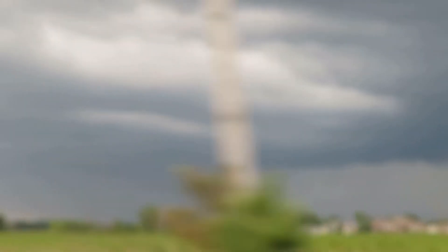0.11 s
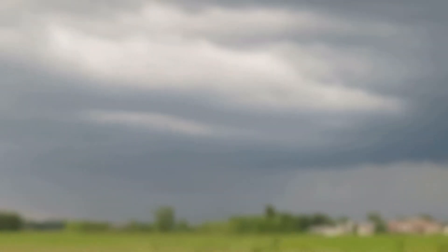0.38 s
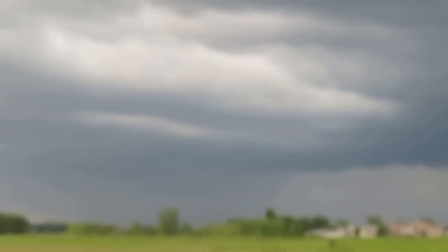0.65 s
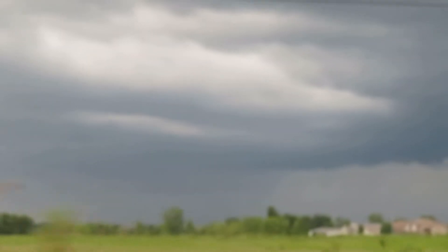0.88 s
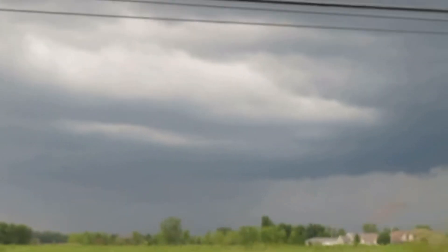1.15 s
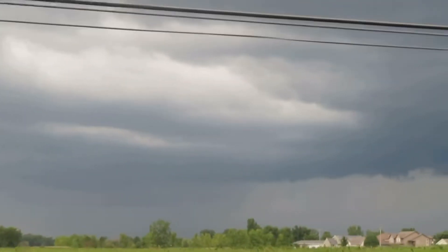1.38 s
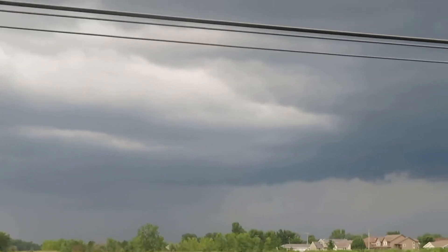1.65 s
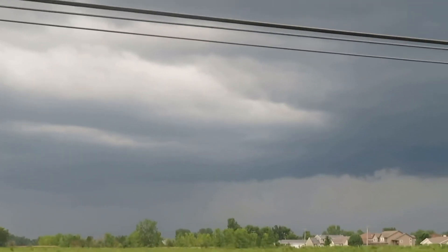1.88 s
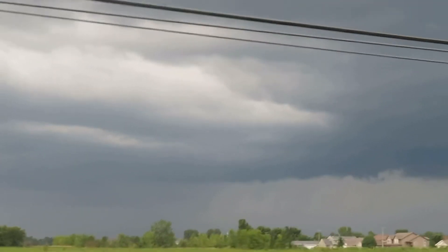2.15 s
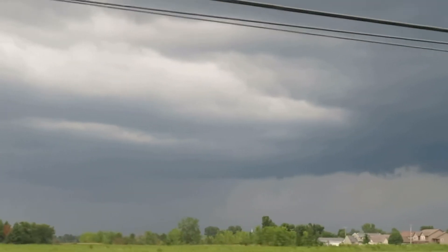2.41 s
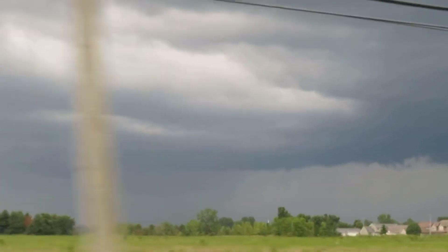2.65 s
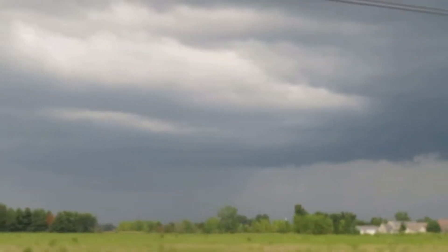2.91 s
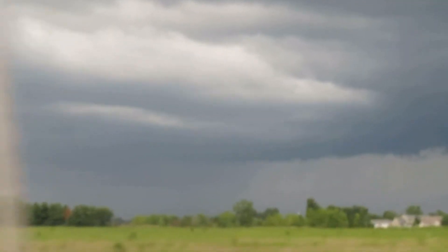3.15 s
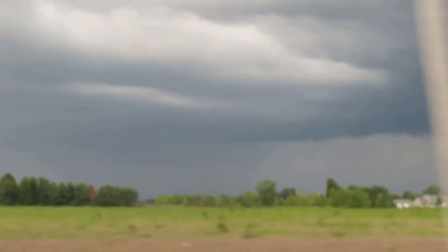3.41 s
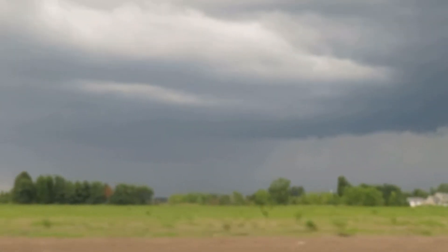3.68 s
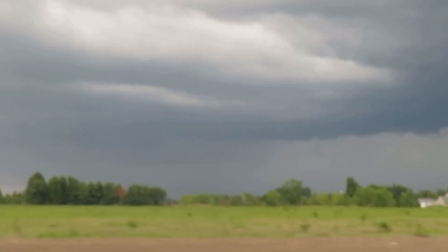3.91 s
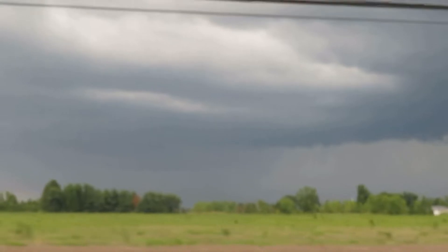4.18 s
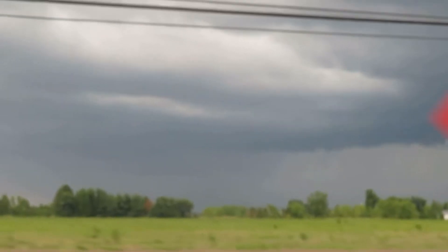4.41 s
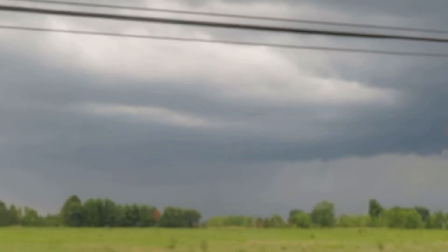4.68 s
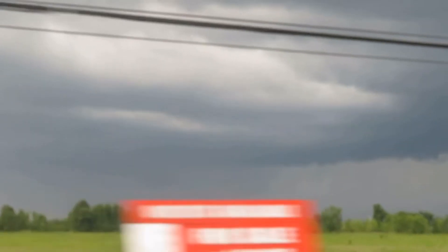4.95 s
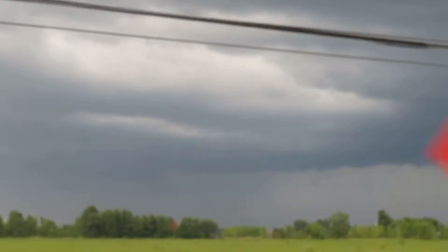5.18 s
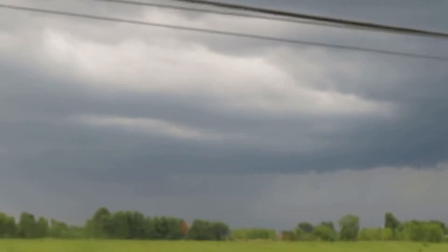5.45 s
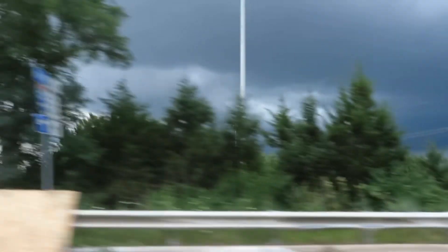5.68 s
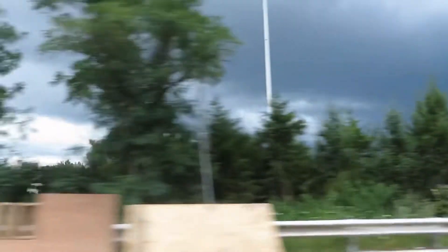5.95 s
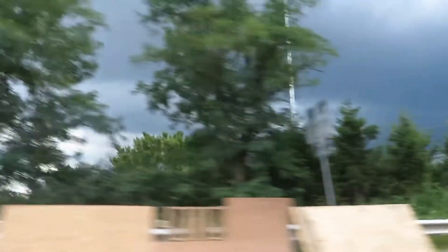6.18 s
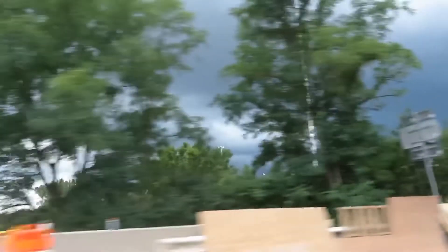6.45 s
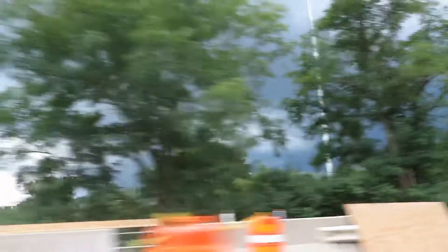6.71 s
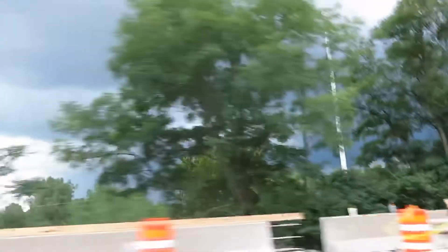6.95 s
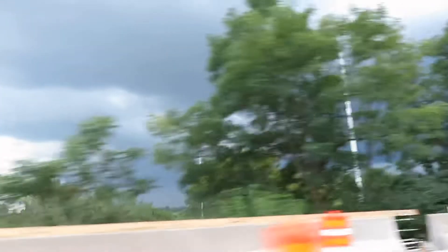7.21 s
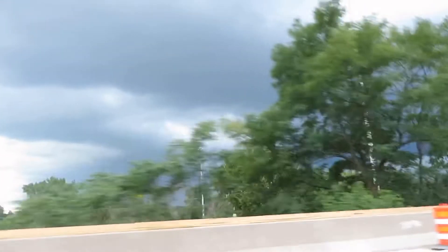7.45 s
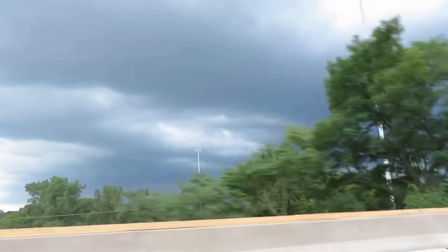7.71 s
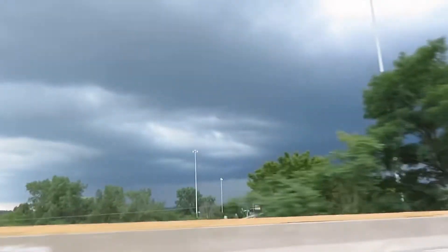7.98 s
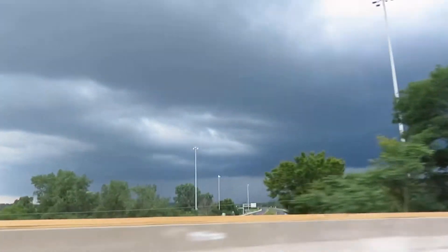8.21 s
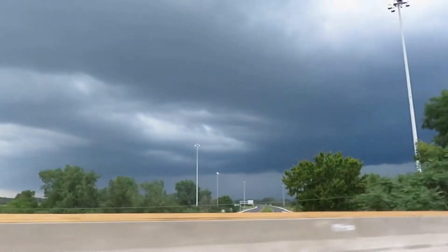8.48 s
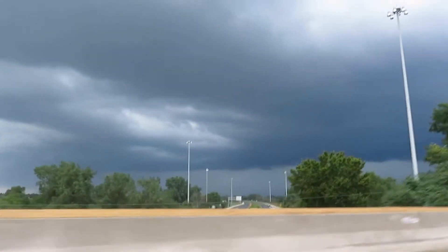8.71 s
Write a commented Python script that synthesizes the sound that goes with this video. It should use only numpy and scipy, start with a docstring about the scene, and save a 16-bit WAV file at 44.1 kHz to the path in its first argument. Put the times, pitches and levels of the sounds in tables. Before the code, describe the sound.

From 0 to about 5.4 seconds, a camera in a moving car catches dull, steady tyre roar with faint air hiss and lumpy low flutter. Irregular wind blasts hit the microphones: centred low thuds with wider, gritty crackle, especially hard near 0.6, 2.06, 4.0 and 4.6. The road noise drops quickly after many hits, then creeps back. Around 5.36 there is a tiny silence of under a tenth of a second. A different, slightly louder road follows, with deep buffeting rumble and lopsided shoves heavier on the left, strongest around 6.3 to 6.6. A light bright tick lands near 6.75. At about 6.96 the rumble stops abruptly and bass thins. A hollow, wavering tread hum swells around 7.5 and fades by 8.1, while crowded thumps and brighter crackle continue to the end near 8.9.

```python
"""Short thumps of wind strike a camera's two microphone ports throughout, over the tyre roar of a moving car.
Roar, air hiss and flutter are shaped noise; each thump is a low mono noise pulse with a wider crackle.
After a brief silent gap the road sounds different, and deep, lopsided rumble joins until the camera's
wind filter switches on and thins the bass; a hollow tread hum and a light tick come late.
The steady sound dips many times, fast, and creeps back."""
import sys
import numpy as np
from scipy import signal
from scipy.fft import rfft, irfft, next_fast_len
from scipy.io import wavfile
from scipy.ndimage import uniform_filter1d, map_coordinates

SR = 44100
rng = np.random.default_rng(int(sys.argv[2]) if len(sys.argv) > 2 else 0)


def gain_from_db(level_db):
    """Turn a decibel level (scalar or array-like) into a linear amplitude factor."""
    decades = np.asarray(level_db, float) / 20
    return 10 ** decades


def unload_audio(sound):
    """Save the sound as a 16-bit wav file, at the path given as the first command line argument."""
    columns = np.transpose(np.atleast_2d(sound))
    # keep every value between -1 and 1, then stretch to whole-number steps
    steps = np.round(np.clip(columns, -1, 1) * 32767)
    wavfile.write(sys.argv[1], SR, steps.astype(np.int16))


N = 390453  # length [samples]
GAP_START_S, GAP_END_S = 5.356, 5.42  # silence between the first and the second road
FILTER_ON_S = 6.957  # the wind filter switches on


def unit(x):
    """Normalisation: scale to rms 1."""
    return x / np.sqrt(np.mean(x ** 2) + 1e-20)


def along(points, hz):
    """Logarithmic frequency: read (Hz, value) points on a log axis."""
    f, v = np.transpose(points)
    return np.interp(np.log(hz + 1), np.log(f + 1), v)


def curves(rows):
    """Linear interpolation: one value per sample for each column after the time."""
    s, *cols = np.transpose(rows)
    return [np.interp(np.arange(N) / SR, s, c) for c in cols]


def wobble(rate):
    """Slow random fluctuation: a smooth curve through random knots, rate knots a second."""
    knots = rng.standard_normal(int(N * rate / SR) + 4)
    return map_coordinates(knots, [np.arange(N) * rate / SR])


def ports(pair, spectrum, alike):
    """Interchannel correlation: colour two unrelated signals and mix them to a given left-right likeness."""
    n = pair.shape[-1]
    hz = np.fft.rfftfreq(n, 1 / SR)
    turn = np.arccos(np.clip(along(alike, hz), -1, 1)) / 2
    z = rfft(pair) * gain_from_db(along(spectrum, hz))
    mid = irfft(z[0] * np.cos(turn), n)
    side = irfft(z[1] * np.sin(turn), n)
    return np.array([mid + side, mid - side])


def rush(spectrum, alike, patchy_db):
    """Non-stationary noise: a stereo rush of rms 1 with random gain patches in time and frequency."""
    z = signal.stft(rng.standard_normal((2, next_fast_len(N + 2048))), nperseg=512)[2]
    field = uniform_filter1d(rng.standard_normal(z.shape[1:]), size=5, axis=0)
    field = uniform_filter1d(field, size=8, axis=1)
    pair = signal.istft(z * gain_from_db(patchy_db * unit(field)), nperseg=512)[1]
    return unit(ports(pair, spectrum, alike)[:, :N])


# drops of the steady sound: (time [s], depth under full level [dB])
DIPS = [(0.108, 3), (0.62, 3), (0.86, 4.5), (1.06, 4.5), (1.367, 11.5), (2.079, 13.5), (2.2, 13), (2.81, 8),
        (2.97, 7.5), (3.427, 9.5), (4.02, 7.5), (4.602, 12), (5.482, 7.5), (6.401, 3.5), (6.5, 6), (6.6, 6),
        (6.799, 8), (8.262, 6), (8.75, 4.5)]


def dips():
    """Gain envelope: each drop falls fast, holds, then climbs steadily; the deepest one counts [dB]."""
    drop_s, hold_s, return_db_per_s = 0.015, 0.061, 11.5
    s, depth_db = np.transpose(DIPS)[:, :, None]
    t = np.arange(0, N + 64, 64) / SR
    climb_db = return_db_per_s * np.clip(t - s - drop_s - hold_s, 0, None)
    drop_db = np.clip((t - s) / drop_s, 0, 1) * (depth_db - climb_db)
    return -np.interp(np.arange(N) / SR, t, drop_db.max(0).clip(0))


# hollow tread hum relative to the roar: (time [s], level [dB])
GROOVE_LEVEL = [(6.9, -15), (7.05, -10.5), (7.5, 0.5), (7.75, -5), (8.1, -18.5)]
# left-right likeness of steady sounds: (frequency [Hz], correlation [-1 to 1])
ROAD_ALIKE = [(1400, 1), (2600, 0.84), (5000, 0.45), (8000, -.3), (11000, -.9)]


def grooves():
    """Narrow-band noise: tread on a grooved stretch gives a wavering hum around one frequency."""
    centre_hz, width_hz = 950, 95
    band = [(centre_hz + k * width_hz, -9 * abs(k)) for k in (-6, -1, 0, 1, 6)]
    level_db = curves(GROOVE_LEVEL)[0] + 1.5 * wobble(9.4)
    return gain_from_db(level_db) * rush(band, ROAD_ALIKE, patchy_db=1.5)


# tyre roar on the first and the second road: (frequency [Hz], level [dB per Hz])
TYRES_FIRST = [(30, -16.5), (60, -1.5), (250, -6.5), (600, -11.5), (1000, -6.5), (1200, -2), (1450, -9.5),
               (1850, -6.5), (2250, -17.5), (2800, -22), (3200, -27.5), (5000, -34), (16000, -100)]
TYRES_SECOND = [(60, 1), (400, -5.5), (620, -10.5), (760, 0.5), (990, -1), (1400, -5), (1600, -8.5),
                (1900, -10.5), (2300, -18.5), (3200, -25), (9000, -53), (16000, -100)]
# air hiss: (frequency [Hz], level [dB per Hz])
HISS = [(1500, -0.5), (3000, -0.5), (5000, -9.5), (7500, -12.5), (10000, -18.5), (16000, -49)]
# air hiss relative to the roar: (time [s], level [dB])
HISS_LEVEL = [(0, -20.5), (5.3, -21.5), (5.44, -12), (5.53, -23.5), (6.25, -19), (6.55, -20), (8.85, -17.5)]


def road():
    """Broadband rolling noise: tyre roar with tread resonances, and thin turbulent hiss past the window."""
    first = np.arange(N) < GAP_END_S * SR
    early = rush(TYRES_FIRST, ROAD_ALIKE, patchy_db=2.0)
    late = rush(TYRES_SECOND, ROAD_ALIKE, patchy_db=2.0) + grooves()
    hiss = gain_from_db(curves(HISS_LEVEL)[0]) * rush(HISS, ROAD_ALIKE, patchy_db=2.5)
    level_db = np.where(first, -28.5, -25.5) + dips() + 0.3 * wobble(12)
    return gain_from_db(level_db) * (np.where(first, early, late) + hiss)


def tick():
    """Transient: a bell-shaped pulse of bright noise makes one light tick nearby."""
    at_s, level_db, spread_s = 6.745, -39, 0.0005
    pulse = gain_from_db(level_db) * np.exp(-.5 * ((np.arange(N) / SR - at_s) / spread_s) ** 2)
    bright = [(2500, -30), (4500, 0), (8500, -12), (14000, -50)]
    return pulse * rush(bright, [(5000, .1)], patchy_db=0)


# flutter noise: (frequency [Hz], level [dB per Hz])
FLUTTER = [(30, -18), (100, 4), (250, 1), (470, 1.5), (560, -8), (1000, -11), (2000, -39), (6000, -68)]
# strength of the small eddies before the dips: (time [s], level [dB])
EDDIES = [(0.0, -28), (0.75, -25.5), (1.4, -38), (1.64, -24.5), (1.85, -46.5), (2.12, -18), (3.1, -33.5),
          (4.0, -27), (4.23, -31.5), (4.7, -26), (5.3, -39.5), (5.65, -27.5), (6.27, -20), (6.98, -24),
          (7.13, -28.5), (7.17, -25), (7.84, -22), (8.25, -17), (8.32, -17.5), (8.84, -19.5)]


def flutter():
    """Amplitude modulation: small eddies crossing the ports break low noise into lumps."""
    # deeper lumps on the first road
    depth = np.where(np.arange(N) < GAP_END_S * SR, 1.17, 0.84)
    lumps = gain_from_db(depth * (2.5 * wobble(30) + 3.5 * wobble(60)))
    level = gain_from_db(curves(EDDIES)[0] + dips())
    return level * unit(lumps * rush(FLUTTER, ROAD_ALIKE, patchy_db=1.5))


def filter_on():
    """Crossfade: 0 to 1 over 4 ms as the wind filter switches on."""
    return np.clip((np.arange(N) / SR - FILTER_ON_S) / .004, 0, 1)


# deep buffeting of both ports: (frequency [Hz], level [dB per Hz])
DEEP = [(15, -19.5), (30, 1), (60, 3.5), (120, 6), (200, -2), (400, -14), (900, -18), (5000, -84)]
# lopsided buffeting: (frequency [Hz], level [dB per Hz])
SIDEWAYS = [(25, -31), (100, -3.5), (300, -2), (600, -19), (1200, -22.5), (5000, -94)]
# steady part of the deep buffeting: (time [s], level [dB])
RUMBLE_LEVEL = [(5.43, -21), (5.5, -19.5), (5.6, -30), (6.3, -21), (6.42, -15.5), (6.52, -28.5),
                (6.8, -22.5), (6.95, -26.5)]
# big eddies: (peak time [s], push on both ports [dB], lopsided push before its left-right split [dB])
SHOVES = [(5.5, -32, -12.5), (5.85, -34, -34), (6.25, -19, -32), (6.3, -19, -31), (6.448, -23, -15.5),
          (6.561, -14.5, -13.5), (6.7, -24, -21.5), (6.79, -24, -13), (6.875, -36, -27),
          (6.949, -44, -13.5)]


def rumble():
    """Turbulent pressure: big eddies push both ports together, and some hit mainly the left one."""
    rise_db_per_s, fall_db_per_s = 497, 392
    t = np.arange(N) / SR
    both, one = np.zeros((2, N))
    for s, both_db, one_db in SHOVES:
        swell = gain_from_db(-np.where(t < s, rise_db_per_s, fall_db_per_s) * abs(t - s))
        both = both + gain_from_db(both_db) * swell
        one = one + gain_from_db(one_db) * swell
    deep_lumps = gain_from_db(1.3 * wobble(30) + 1.8 * wobble(70))
    deep = unit(deep_lumps * rush(DEEP, ROAD_ALIKE, patchy_db=1.0))
    common = (gain_from_db(curves(RUMBLE_LEVEL)[0]) + both) * deep
    sideways = unit(gain_from_db(4.0 * wobble(40)) * rush(SIDEWAYS, [(100, 1.0)], patchy_db=4.5))
    lopsided = one * sideways * [[1.4], [-.6]]  # left, right
    return (common + lopsided) * (t > GAP_END_S) * (1 - filter_on())


def puffs():
    """Random arrivals: extra blasts near the level of the eddies; none from the gap to filter-on."""
    per_s, crackle_over_thud_db, scatter_db, half_width_ms = 9, -6.5, 2, 4.5
    count = int(per_s * N / SR)
    at = rng.integers(N, size=count)
    size, grit, width = rng.standard_normal((count, 3)).T
    thud_db = (curves(EDDIES)[0] + dips())[at] + scatter_db * size
    crackle_db = thud_db + crackle_over_thud_db + scatter_db * grit
    rows = np.transpose([at / SR, thud_db, crackle_db, half_width_ms * np.exp(width / 2)])
    return rows[(at < GAP_START_S * SR) | (at > FILTER_ON_S * SR)]


# low thud of a blast: (frequency [Hz], level [dB per Hz])
THUD = [(20, -21), (60, -5.5), (150, 2), (300, 3), (480, 0), (600, -12.5), (1000, -23.5), (2000, -58),
        (6000, -120)]
# crackle of a blast, before its brightening: (frequency [Hz], level [dB per Hz])
CRACKLE = [(300, 0), (700, 7.5), (1300, -3.5), (2800, -22.5), (5000, -45.5), (10000, -55.5), (16000, -73.5)]
# left-right likeness of the crackle: (frequency [Hz], correlation [-1 to 1])
WIND_ALIKE = [(230, 1), (350, .93), (700, 0.9), (1500, 0.55), (2600, -0.3), (8000, -0.7)]
# strong and weak blasts, each at its own time:
# (middle [s], thud [dB], crackle [dB], half width before limiting [ms])
BLASTS = [(0.006, -10, -16.5, 8), (0.096, -11, -26, 18), (0.158, -20, -27, 12.7), (0.22, -12.5, -26, 2.5),
          (0.409, -20, -40, 3), (0.44, -22, -30.5, 12), (0.498, -13.5, -31, 2), (0.6, -8.5, -10.5, 2.2),
          (0.727, -22.5, -26.5, 9), (0.837, -13.5, -19.5, 11), (0.881, -22.5, -28.5, 9.8),
          (1.034, -12, -18.5, 16), (1.336, -12, -19.5, 7.6), (1.357, -14.5, -11.5, 6),
          (1.367, -12, -19, 1.6), (1.579, -18, -19.5, 4.5), (1.683, -23, -39, 4.3),
          (1.889, -25.5, -43, 8.4), (2.028, -16, -35, 1.6), (2.053, -10.5, -14.5, 1.9),
          (2.06, -4, -11.5, 2.4), (2.067, -25, -7.5, 1), (2.1, -25.5, -24.5, 6.2),
          (2.183, -20.5, -23.5, 7.3), (2.226, -21.5, -31, 12), (2.369, -14, -27.5, 3.4),
          (2.472, -28, -28.5, 9.5), (2.532, -23, -33.5, 47), (2.652, -22.5, -31, 3.2),
          (2.784, -20, -23.5, 11.7), (2.811, -13.5, -14.5, 4.7), (2.959, -10.5, -21.5, 3.1),
          (3.095, -28, -46, 12), (3.285, -22, -36, 6), (3.345, -17.5, -21, 5.3), (3.429, -10, -12.5, 3.45),
          (3.505, -21, -40, 2.5), (3.909, -23, -45, 3.5), (4.005, -5.5, -19, 2.56), (4.412, -22.5, -48, 12),
          (4.605, -4, -12, 3.55), (4.685, -28.5, -43, 17), (4.801, -30.5, -46, 14), (4.987, -23, -32, 22),
          (5.057, -23, -43, 8.3), (5.188, -11.5, -20, 3.3), (5.303, -17.5, -18, 8.3),
          (5.334, -18, -18, 6.9), (5.432, -31.5, -21.5, 7.6), (5.49, -11.5, -20, 3.1), (6.27, -22, -21, 23),
          (6.39, -27, -20.5, 9.6), (6.445, -17.5, -23, 4), (6.629, -14, -26, 2.6), (6.796, -14.5, -37, 1.5),
          (6.954, -19.5, -34, 3.5), (7.159, -19.5, -38, 5.5), (7.281, -19, -29, 3.6),
          (7.304, -10, -32, 2.3), (7.427, -19, -28, 7.1), (7.444, -9.5, -27, 4.3), (7.507, -14, -17.5, 2.3),
          (7.534, -12, -23, 3.6), (7.558, -9.5, -20, 4.4), (7.667, -12.5, -20.5, 1.9),
          (7.705, -16, -26, 17), (7.742, -15.5, -24.5, 4.8), (7.815, -12.5, -20, 7),
          (7.844, -12.5, -21, 3.5), (7.872, -8.5, -17, 2), (7.916, -6.5, -16, 4.7), (8.054, -17, -40, 2.3),
          (8.134, -21, -18, 4.3), (8.153, -15, -16.5, 5.4), (8.187, -10, -24.5, 12), (8.242, -12.5, -17, 5),
          (8.265, -20, -12.5, 2), (8.425, -14.5, -23, 10.6), (8.446, -17.5, -18.5, 4.4),
          (8.576, -19, -18, 3.6), (8.589, -12.5, -20, 4.5), (8.613, -13.5, -16, 6.4),
          (8.64, -15, -14.5, 3.2), (8.66, -17, -11.5, 5), (8.675, -23, -13.5, 9), (8.726, -12, -21, 9.7),
          (8.786, -15.5, -20.5, 3.4), (8.812, -7, -22, 2.3), (8.839, -12, -29, 4.9)]


def blasts(size=4096):
    """Turbulent impulses: each blast is a brief pressure swell, a low mono thud with a wide, gritty crackle."""
    s, thud_db, crackle_db, width_ms = np.transpose([*puffs(), *BLASTS])[:, :, None]
    ms = (np.arange(size) - size // 2) * 1000 / SR
    hz = np.fft.rfftfreq(size, 1 / SR)
    noise = rng.standard_normal((len(s), 5, size))
    # a quick swell with a slower tail
    swell = np.exp(-.5 * abs(ms / np.clip(width_ms, 1.5, 25)) ** 2.66)
    swell = swell + 0.26 * (ms > 0) * (ms / 6) * np.exp(-abs(ms) / 12)
    swell *= np.hanning(size)

    def at_level(x, db):
        """Energy matching: set the level relative to the energy of the swell."""
        return gain_from_db(db) * x * np.sqrt((swell ** 2).sum(-1) / (x ** 2).sum(-1))[..., None]

    thud_noise = irfft(rfft(noise[:, 0]) * gain_from_db(along(THUD, hz)), size)
    thud = at_level(swell * thud_noise, thud_db)
    # the crackle breaks up into spits a few milliseconds long, with one late, sharp snap
    spits = uniform_filter1d(noise[:, 3], size=130)
    snap = 1.1 * np.exp(-.5 * ((ms - .6 * width_ms) / 0.49) ** 2)
    grit = swell ** 1.33 * gain_from_db(4.5 * unit(spits)) + snap
    # above -21 dB, louder crackle is brighter: dB per octave from 700 to 2000 Hz
    tilt_db = 0.53 * np.clip(crackle_db + 21, 0, None)
    bite = gain_from_db(tilt_db * np.log2(np.clip(hz, 700, 2000) / 700))
    # each eddy favours its own bands, a few hundred hertz wide
    bands = uniform_filter1d(noise[:, 4, :len(hz)], size=24)
    bands = uniform_filter1d(bands, size=24)
    bite *= gain_from_db(3 * unit(bands))
    crackle = ports(grit * noise[:, 1:3].swapaxes(0, 1), CRACKLE, WIND_ALIKE)
    crackle = at_level(irfft(rfft(crackle) * bite, size), crackle_db)
    # add every blast at its place, centred on its middle
    where = (np.round(s * SR).astype(int) + np.arange(size)).ravel()
    sides = [np.bincount(where, (thud + c).ravel(), N + size) for c in crackle]
    return np.array([side[size // 2:][:N] for side in sides])


def scene():
    """Superposition: road and air hiss, tick, and wind on the ports."""
    return road() + tick() + flutter() + rumble() + blasts()


def top_cut(x):
    """Nothing passes above the cut-off."""
    return signal.sosfilt(signal.butter(12, 15100, fs=SR, output="sos"), x)


# share of high-passed sound in the blend once the filter is on: (time [s], share [0 to 1])
THIN = [(7.0, 0.47), (8.3, 0.76)]


def record(dry):
    """High-pass filtering and saturation: the wind filter thins the bass, peaks overload softly, a gap is cut."""
    t = np.arange(N) / SR
    thin = signal.sosfilt(signal.butter(2, 200, "high", fs=SR, output="sos"), dry)
    share = filter_on() * curves(THIN)[0].clip(0, 1)
    heard = dry + (thin - dry) * share
    limited = heard / (1 + abs(heard) ** 12) ** (1 / 12)
    mix = limited * ((t < GAP_START_S) | (t > GAP_END_S))
    return top_cut(mix)


dry = scene()
out = record(dry)
unload_audio(out)
```